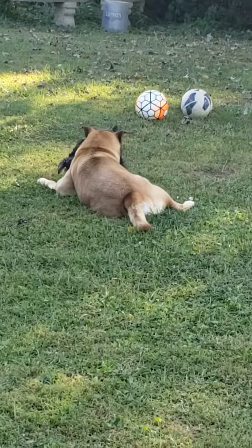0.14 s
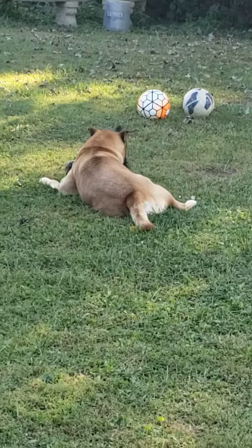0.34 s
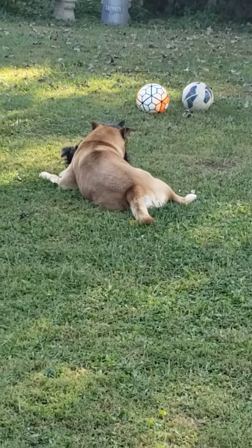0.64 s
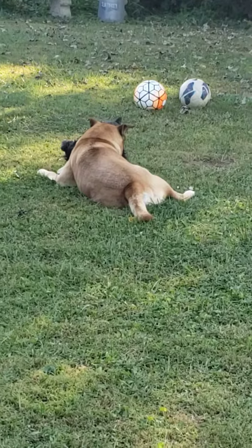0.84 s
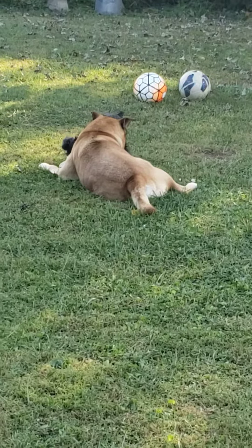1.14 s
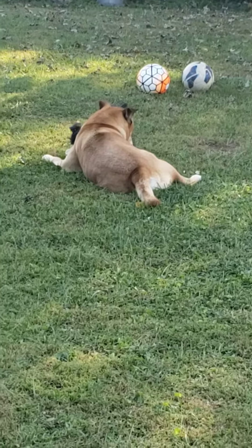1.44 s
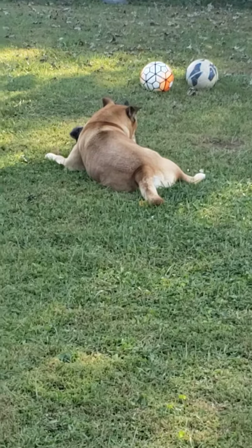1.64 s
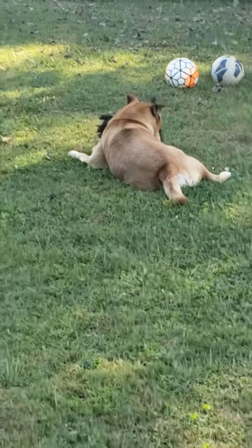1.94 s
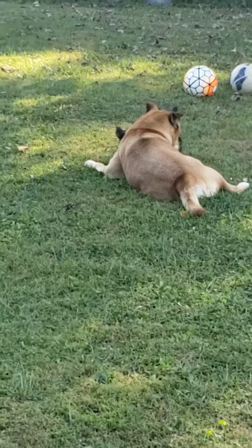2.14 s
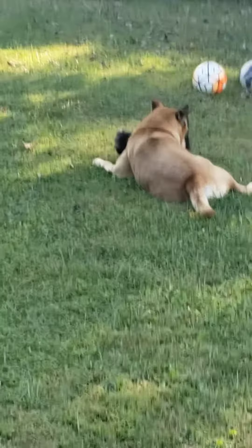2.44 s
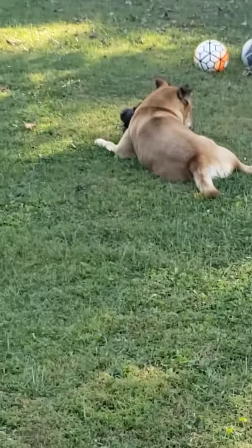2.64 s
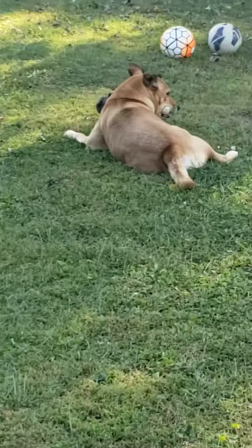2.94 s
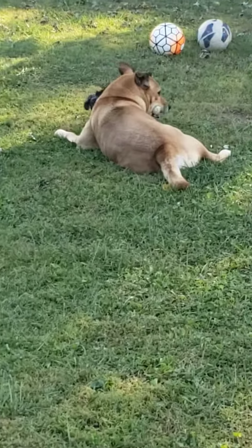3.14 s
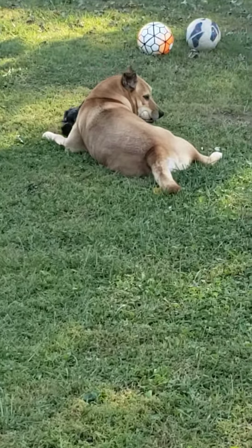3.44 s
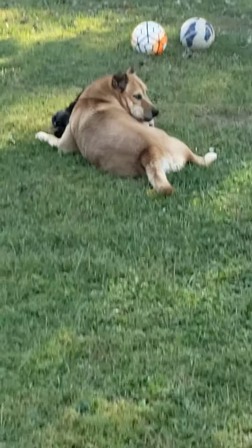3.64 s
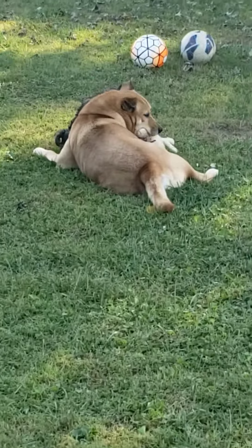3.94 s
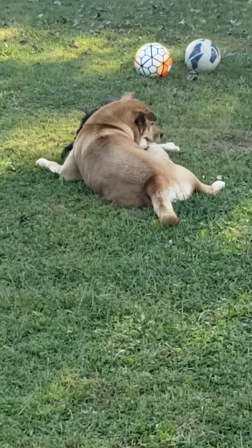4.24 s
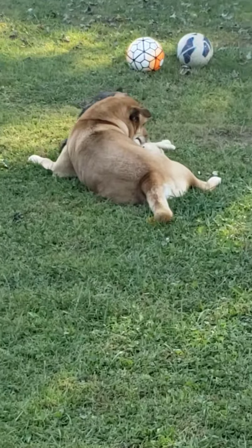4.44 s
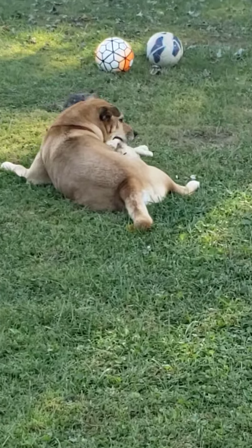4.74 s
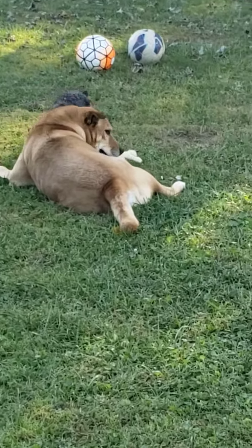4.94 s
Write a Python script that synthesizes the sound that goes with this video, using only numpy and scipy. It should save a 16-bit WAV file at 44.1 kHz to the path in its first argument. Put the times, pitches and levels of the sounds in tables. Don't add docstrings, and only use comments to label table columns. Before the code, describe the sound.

Outdoors, a continuous shrill cicada buzz sits to the left above a soft, distant road and engine rumble. Low wind thuds gather on the left microphone, peak shortly before two seconds, then thin out. Bright scratchy sleeve rubs and quick flicks come close to the right microphone, mostly after 1.3 seconds, with small ticks and knocks on its casing. A faint descending bird call passes around 3.9 seconds. The dog makes no sound.

```python
import sys
import numpy as np
from scipy import signal
from scipy.io import wavfile

SR = 44100
rng = np.random.default_rng(int(sys.argv[2]) if len(sys.argv) > 2 else 0)


def generate_wav(signal):
    frames = np.transpose(np.atleast_2d(signal))
    scaled = np.clip(frames, -1, 1) * 32767
    pcm = np.round(scaled).astype(np.int16)
    wavfile.write(sys.argv[1], SR, pcm)


def makeup_ratio(level_db):
    decades = np.asarray(level_db, float) / 20
    return 10 ** decades


N = 224160
LEFT_LEAD = 11


def rms_one(x):
    return x / np.sqrt(np.mean(x ** 2) + 1e-20)


def in_time(rows):
    s, *columns = np.transpose(rows)
    return [np.interp(np.arange(N) / SR, s, column) for column in columns]


def at_hz(points, hz):
    point_hz, value = np.transpose(points)
    return np.interp(np.log(hz), np.log(point_hz), value)


def drift(rate_hz):
    r = np.exp(-80 * np.pi * rate_hz / SR)
    noise = rng.standard_normal(N // 40 + 2002)
    slow = signal.lfilter([1], [1, -2 * r, r * r], noise)[2000:]
    return np.interp(np.arange(N) / 40, np.arange(len(slow)), rms_one(slow))


def swells(rows, rise_db_per_s, fall_db_per_s, rest_db):
    t = np.arange(N) / SR
    power = makeup_ratio(rest_db) ** 2
    for start_s, hold_s, level_db in rows:
        early_s = np.maximum(start_s - t, 0)
        late_s = np.maximum(t - start_s - hold_s, 0)
        loss_db = rise_db_per_s * early_s + fall_db_per_s * late_s
        power = power + 10 ** ((level_db - loss_db) / 10)
    return 10 * np.log10(power)


def resonate(x, hz, width_hz, count):
    r = np.exp(-np.pi * width_hz / SR)
    section = [(1 - r * r) / 2, 0, (r * r - 1) / 2, 1, -2 * r * np.cos(2 * np.pi * hz / SR), r * r]
    return signal.sosfilt([section] * count, x)


def ring(x, hz, t60_s):
    r = makeup_ratio(-60 / (t60_s * SR))
    w = 2 * np.pi * hz / SR
    return signal.lfilter([0, np.sin(w)], [1, -2 * r * np.cos(w), r * r], x + 1e-18)


def bandpass(x, low_hz, high_hz):
    return signal.sosfilt(signal.butter(2, [low_hz, high_hz], "band", fs=SR, output="sos"), x)


def bands(source, low_hz, high_hz):
    edges = low_hz * 2 ** (np.arange(0, 3 * np.log2(high_hz / low_hz) + 1) / 3)
    for k, (low, high) in enumerate(zip(edges, edges[1:])):
        band = bandpass(source[k % 2], low, min(high, 0.45 * SR))
        yield np.sqrt(low * high), np.sqrt(SR / 2) * band


def far_air():
    # hz, density_db_per_hz
    drone = [(40, -79.5), (55, -70.5), (75, -73), (100, -79.5), (120, -77.5), (150, -95)]
    # hz, density_db_per_hz
    air_left = [(160, -82.5), (250, -87), (400, -92), (600, -87.5), (900, -89.5), (1300, -90), (1650, -91),
                (2000, -87), (2400, -100), (3000, -106.4), (4200, -111.9), (5000, -105.3)]
    air_right = [(160, -82.5), (250, -89), (450, -102), (760, -90.5), (1050, -99), (1450, -98),
                 (2000, -104), (3000, -108), (4700, -118), (5500, -112), (8500, -109), (10300, -116),
                 (12500, -115), (15500, -116)]
    # hz, likeness (0-1)
    likeness = [(60, 0.92), (210, 0.93), (500, 1), (800, 0.83), (1300, 0.35), (2500, 0.022)]
    left_curve = drone + air_left + [(6000, -116), (8500, -135), (16000, -125)]
    right_curve = drone + air_right
    out = np.zeros((2, N))
    white = rng.standard_normal((2, 3, N))
    for hz, (shared, left, right) in bands(white, 34.98, 17000):
        alike = at_hz(likeness, hz)
        left = np.sqrt(alike) * np.roll(shared, -LEFT_LEAD) + np.sqrt(1 - alike) * left
        right = np.sqrt(alike) * shared + np.sqrt(1 - alike) * right
        pair = np.array([makeup_ratio(at_hz(left_curve, hz)) * left, makeup_ratio(at_hz(right_curve, hz)) * right])
        out += makeup_ratio(1.46 * drift(3.64)) * pair
    return out


def engine():
    # time_s, level_db
    engine_swell = [(0, -60), (.6, -64), (1.4, -55.5), (2, -63.5), (2.6, -66), (3.3, -55), (3.8, -71),
                    (4.3, -68.5), (5.08, -77)]
    # pitch_hz, width_hz, level_db
    engine_notes = [(75.03, 5.6, 5.5), (109.13, 4.1, -3.5)]
    notes = np.zeros(N)
    for hz, width_hz, level_db in engine_notes:
        notes += makeup_ratio(level_db) * rms_one(resonate(rng.standard_normal(N), hz, width_hz, count=2))
    return makeup_ratio(in_time(engine_swell)[0]) * notes


def bird():
    # time_s, pitch_hz, level_db
    whistle = [(3.86, 3790, -100), (3.89, 3720, -85), (3.95, 3560, -81), (4.04, 3420, -84),
               (4.08, 3350, -90), (4.1, 3310, -102)]
    hz, level_db = in_time(whistle)
    phase = 2 * np.pi * np.cumsum(hz + 35 * drift(60)) / SR
    partials = np.sin(phase) + makeup_ratio(-5) * np.sin(0.775 * phase)
    call = makeup_ratio(level_db + 10.5 + 3 * drift(40)) * partials
    echoes = np.zeros(N)
    for delay_s, echo_db in [(0.035, -7), (0.08, -6), (0.14, -12)]:
        echoes += makeup_ratio(echo_db) * np.roll(call, round(delay_s * SR))
    return np.array([makeup_ratio(-4) * call + echoes, call + echoes])


def ticks():
    # start_s, knock_db, crack_db, crack_low_edge_hz
    taps = [
        (2.0672, -41, -36, 4250),
        (2.456, -52, -50, 3500),
        (3.867, -52.5, -70, 3500),
        (1.983, -52, -61, 6000),
        (3.311, -67, -47, 3500),
        (4.208, -75, -46, 8000),
        (4.547, -76, -45, 9500),
    ]
    # pitch_hz, left_db, right_db, t60_s
    housing = [(169, 12, 19, 0.0057), (454, 4.5, -14, 0.018), (840, -25, 3, 0.0035), (940, 11, 2, 0.0041)]
    knock, crack = np.zeros(N), np.zeros(N)
    decay = np.exp(-np.arange(200) / 45)
    for start_s, knock_db, crack_db, low_hz in taps:
        knock[round((start_s + 0.0013) * SR)] = makeup_ratio(knock_db)
        burst = rng.standard_normal(200) * decay
        crack[round(start_s * SR):][:200] = makeup_ratio(crack_db) * bandpass(burst, low_hz, low_hz + 7000)
    knock = bandpass(knock, 260, 1000)
    body = np.zeros((2, N))
    for hz, left_db, right_db, t60_s in housing:
        body += makeup_ratio(np.array([[left_db], [right_db]])) * ring(knock, hz, t60_s)
    dull = signal.sosfilt(signal.butter(4, 6000, fs=SR, output="sos"), crack)
    return body + np.array([makeup_ratio(-5) * np.roll(dull, 2 * LEFT_LEAD), crack])


def sleeve():
    # hz, density_db_per_hz
    cloth = [(2500, -13.5), (4500, -13.5), (6000, -12.5), (8000, -5), (9500, 0.5), (10600, -4),
             (12000, 4.5), (14000, -11), (15600, -6.5)]
    # start_s, hold_s, level_db
    drags = [(1.38, 0.43, -79.5), (1.86, 0.057, -85), (2.1, .04, -83), (2.72, 0.19, -82),
             (3.27, 0.078, -83), (3.62, .32, -80), (4.0, 0.17, -94), (4.26, 0.081, -83), (4.4, 0.14, -77.5),
             (4.64, 0.2, -88)]
    # start_s, hold_s, level_db
    flicks = [(0.35, .01, -103), (0.55, .03, -97), (1.32, 0.036, -77), (1.58, 0.043, -83), (1.92, .04, -82),
              (2.068, 0.033, -82), (2.46, .01, -85), (3.155, 0.026, -78.5), (3.43, 0.073, -73),
              (3.74, 0.046, -79), (4.21, 0.018, -81), (4.54, 0.018, -83), (4.935, 0.053, -79.5)]
    grains = rng.standard_normal((2, 2, N)) * makeup_ratio(1.8 * rng.exponential(1, N))
    rub = np.zeros((2, N))
    for hz, band in bands(grains, 2224, 17000):
        rub += makeup_ratio(at_hz(cloth, hz) + 1.3 * drift(5.3)) * band
    rub = rms_one(rub) * makeup_ratio(np.array([[-1.5], [12.5]]))
    drag_db = swells(drags, rise_db_per_s=91, fall_db_per_s=69, rest_db=-87) + 1.3 * drift(12)
    flick_db = swells(flicks, rise_db_per_s=268, fall_db_per_s=209, rest_db=-120)
    return makeup_ratio(drag_db) * rub, (makeup_ratio(flick_db) + makeup_ratio(drag_db - 10)) * rub


def wind():
    # start_s, hold_s, level_db
    gusts = [(0.04, 0.083, -54), (0.33, .02, -60), (0.53, 0.025, -47), (0.66, .09, -48), (0.84, 0.19, -51),
             (1.16, 0.077, -61), (1.29, 0.19, -47), (1.62, 0.13, -46.5), (1.75, 0.022, -35.5),
             (1.86, 0.041, -35), (1.95, 0.23, -47), (2.27, 0.13, -52.5), (2.84, 0.016, -51.5),
             (2.93, 0.018, -45.5), (3.1, 0.2, -57), (3.45, 0.034, -60), (3.72, 0.23, -52.5),
             (4.94, 0.067, -52)]
    # time_s, peak_db, pitch_hz, half_length_ms
    buffets = [(0.675, -31.5, 53.6, 15), (1.479, -26, 63.7, 4.8), (1.741, -25, 101, 4.3),
               (1.779, -30, 63.3, 64), (1.869, -21.5, 107, 8.6), (1.89, -31, 60, 15),
               (2.154, -28.5, 57, 11), (2.928, -35, 61, 16), (2.968, -31, 60, 10.5)]
    gust_db = swells(gusts, rise_db_per_s=262, fall_db_per_s=215, rest_db=-100.5)
    low = rms_one(resonate(rng.standard_normal(N), 49.1, 70, count=3))
    high = rms_one(resonate(rng.standard_normal(N), 74.6, 136, count=3))
    high_db = -7.5 + 1.2 * (gust_db + 20)
    out = makeup_ratio(gust_db + 4 + 1.47 * drift(6.2)) * (low + makeup_ratio(high_db) * high)
    for time_s, peak_db, hz, half_ms in buffets:
        t = np.arange(N) / SR - time_s
        near = np.abs(t) < 0.15
        t = t[near]
        out[near] += makeup_ratio(peak_db) * np.exp(-(t * 1000 / half_ms) ** 2) * np.cos(2 * np.pi * hz * t)
    return out


def cicadas():
    # tymbal_hz, width_hz, left_db, right_db, throb_depth (0-1)
    chorus = [
        (6544, 800, -54.5, -68.5, 0.07),
        (6834, 560, -51.5, -66.5, 0),
        (7195, 760, -49.5, -85, 0.41),
        (13700, 2300, -69.5, -113, 0),
        (5424, 570, -74.5, -115, 0.2),
        (3540, 18, -87, -122, 0.55),
    ]
    throb_rates = [44, 46.5, 46.5, 45, 30, 8]
    out, t = np.zeros((2, N)), np.arange(N) / SR
    for (hz, width_hz, left_db, right_db, depth), throbs_per_s in zip(chorus, throb_rates):
        group = np.zeros((2, N))
        for side in range(2):
            cycles = throbs_per_s * (t + 0.014 * drift(0.94))
            throb = 1 + depth * np.cos(2 * np.pi * cycles)
            clicks = (rng.random(N) < 4500 / SR) * rng.standard_normal(N)
            song = rms_one(resonate(throb * clicks, hz, width_hz, count=3))
            group[side] = song * makeup_ratio(0.4 * drift(2.5))
        group[1] += 0.18 * np.roll(group[0], LEFT_LEAD)
        out += makeup_ratio(np.array([[left_db], [right_db]])) * group
    return out


def ports(x):
    # hz, width_hz, depth (0-1)
    dips = [(9500, 4200, .98), (10800, 2200, .8)]
    out = x.copy()
    for side, (hz, width_hz, depth) in enumerate(dips):
        for _ in range(2):
            out[side] -= depth * resonate(out[side], hz, width_hz, count=1)
    return out


def scene():
    drag, flick = sleeve()
    airborne = far_air() + engine() + bird() + cicadas() + drag + flick * [[1], [0]]
    gusty = wind() * makeup_ratio(np.array([[0], [-26.0]]))
    return ports(airborne) + flick * [[0], [1]] + ticks() + gusty


def band_limit(x):
    return signal.sosfilt(signal.butter(12, 15760, fs=SR, output="sos"), x)


def record(dry):
    out = signal.sosfilt(signal.butter(2, 31, "high", fs=SR, output="sos"), dry)
    return band_limit(out)


dry = scene()
out = record(dry)
generate_wav(out)
```